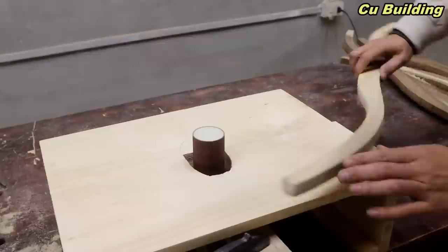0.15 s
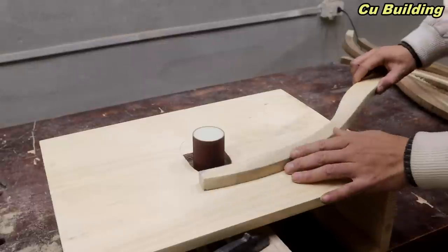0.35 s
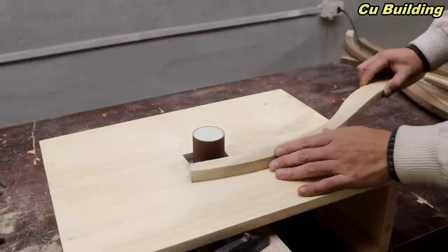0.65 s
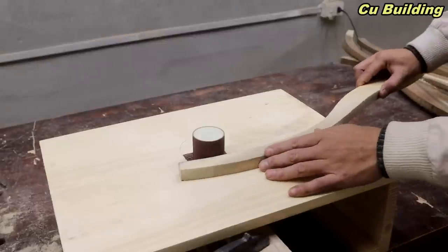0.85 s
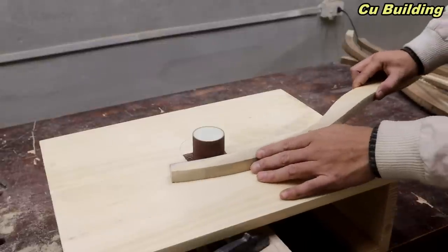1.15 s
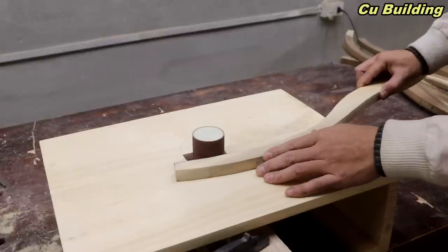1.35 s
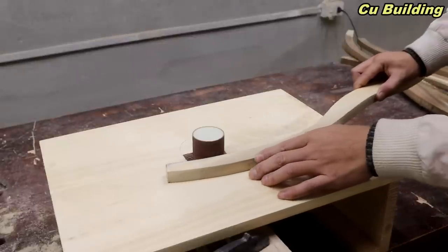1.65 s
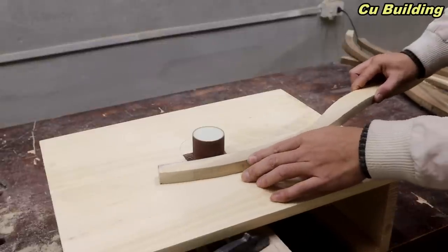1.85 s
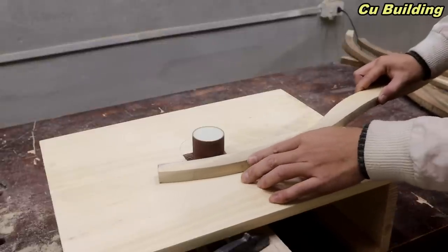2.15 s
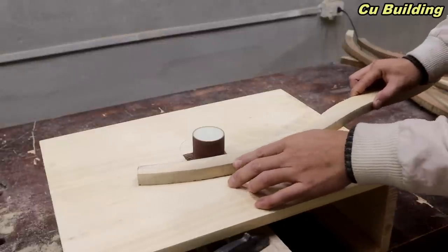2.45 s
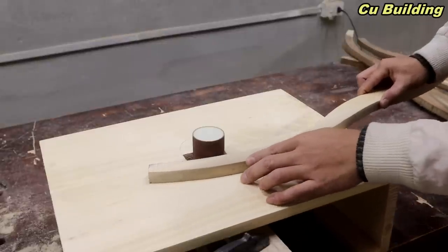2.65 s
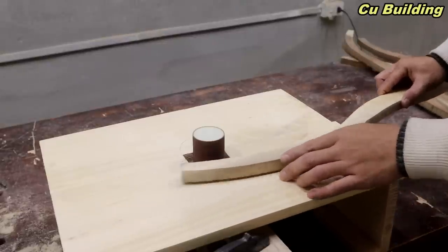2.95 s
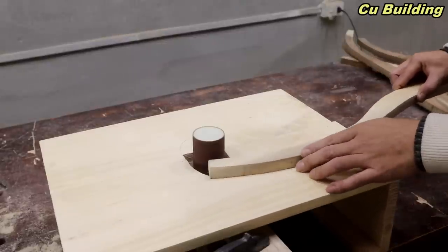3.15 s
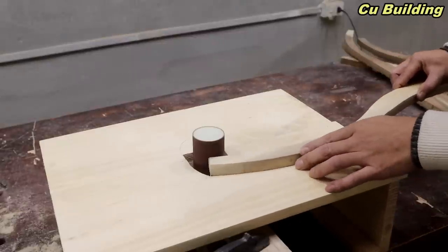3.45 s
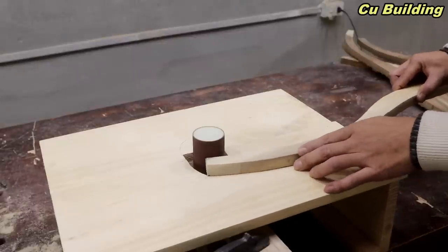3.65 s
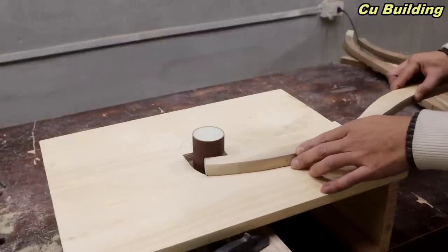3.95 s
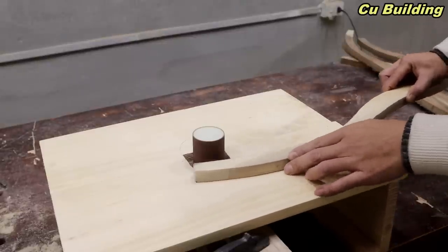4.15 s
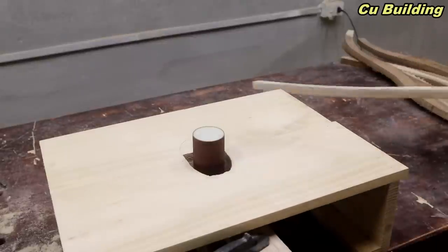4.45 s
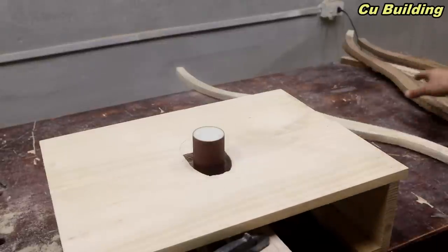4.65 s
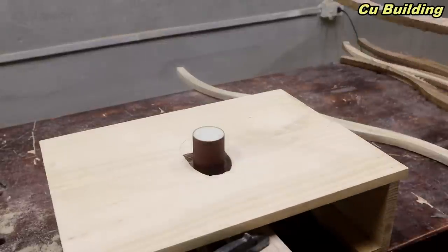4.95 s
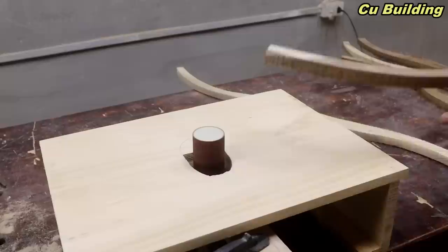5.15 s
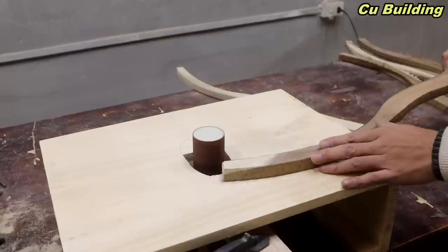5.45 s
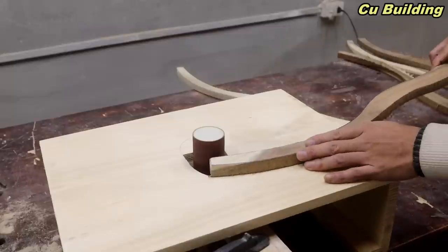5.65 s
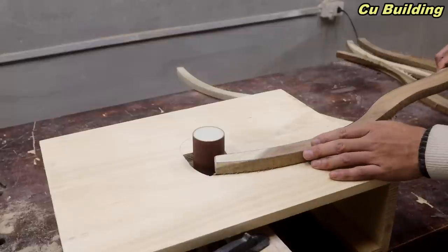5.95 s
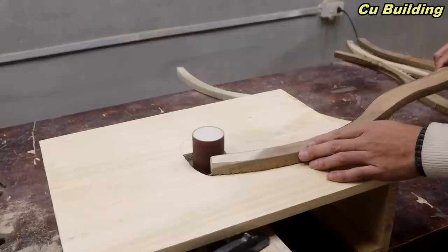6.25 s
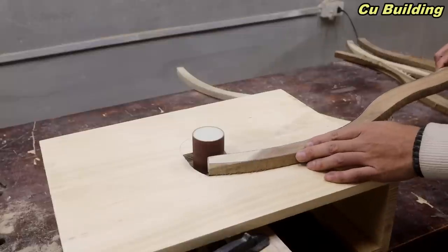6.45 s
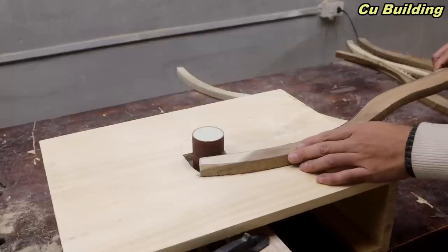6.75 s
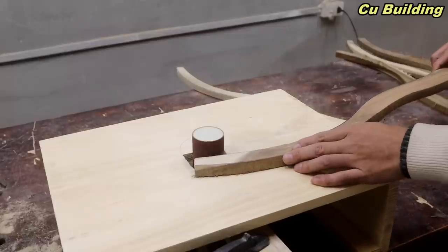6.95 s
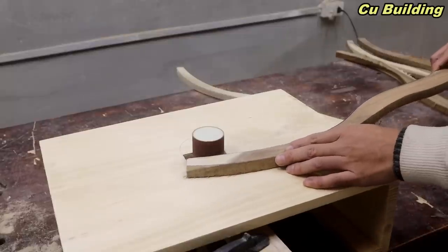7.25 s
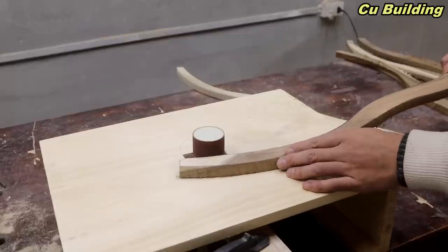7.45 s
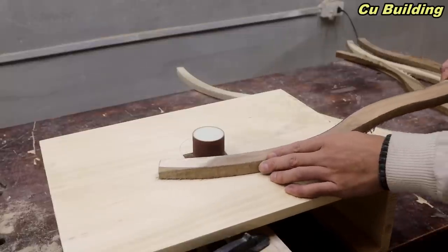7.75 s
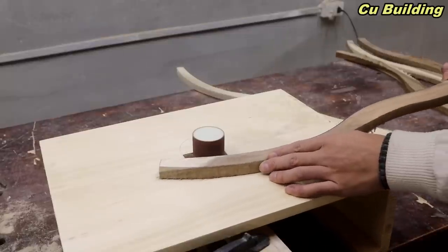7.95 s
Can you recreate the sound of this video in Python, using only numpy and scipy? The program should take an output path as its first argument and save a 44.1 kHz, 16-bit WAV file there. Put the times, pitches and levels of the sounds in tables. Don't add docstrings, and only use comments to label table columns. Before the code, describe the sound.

A small geared motor is already whining at 0 s, close to a stereo microphone pair in a workshop: a strong whistle near 1.7 kHz, a higher one near 5 kHz, lower hums and airy fan hiss. A soft panel hum marks the first touch at 0.1 s. A faint distant engine swells around 1 s. From 1 s the wood presses on the drum; dry gritty rasp and low strip chatter rise while all whines sag together, swelling and fading as they sweep through resonances, easing around 3 s and pressing again until 4.2 s. The motor climbs back to its free pitch. At 4.7 s the strip lands with a bright, rattling wooden clack, and overall loudness dips, then creeps back. From 5.8 s a second pass rasps harder, pulling the pitch lowest around 7 s, with faint dull table bumps between 6.5 and 7.6 s. Sanding continues to the end at about 8 s.

```python
import sys
import numpy as np
from scipy import signal
from scipy.fft import rfft, irfft, next_fast_len
from scipy.io import wavfile
from scipy.ndimage import map_coordinates

SR = 44100
rng = np.random.default_rng(int(sys.argv[2]) if len(sys.argv) > 2 else 0)


def voltage_ratio(decibels):
    exponent = np.asarray(decibels, float) / 20
    return 10 ** exponent


def generate_wav(sig):
    pcm = np.round(np.clip(np.atleast_2d(sig).T, -1, 1) * 32767).astype(np.int16)
    wavfile.write(sys.argv[1], SR, pcm)


N = 357651
TIME = np.arange(N) / SR
PADDED = next_fast_len(N + 4096, real=True)
HZ = np.arange(PADDED // 2 + 1) * SR / PADDED + 1e-3

MESH = 3.6985
DRUM = MESH / 41
FREE_TURNS = 460.5
TORQUE_S = 0.013

# frequency in Hz, likeness 0-1, lead of the left in radians, left minus right in dB.
PAIR = [(40, .6, .05, .3), (130, 0.93, 0.11, 0), (400, 0.92, 0.17, -0.8), (900, 0.96, 0.41, 0),
        (1840, 0.9, 0.45, 0.2), (3000, 0.71, 0.47, -1), (5160, 0.87, 0.41, -1.5), (7300, 0.62, 0.23, -3.5),
        (8660, 0.52, 1.16, -4), (9870, .45, 3.1, -6.2), (16000, 0.43, 2.1, 2)]


def lag(x, seconds):
    r = np.exp(-1 / (seconds * SR))
    return signal.lfilter([1 - r], [1, -r], x - x[0]) + x[0]


def drift(rate):
    knots = rng.standard_normal(2000)
    places = np.minimum(TIME[::64] * rate, 1990)
    return map_coordinates(knots, [places], order=3).repeat(64)[:N]


def swells(rows):
    return sum(db * np.exp(-((TIME - s) / length) ** 2) for s, length, db in rows)


def at_hz(rows, hz, column=1):
    return np.interp(np.log(hz), np.log(np.array(rows)[:, 0]), np.array(rows)[:, column])


def heard(x):
    half_lead = np.exp(.5j * at_hz(PAIR, HZ, column=2))
    half = half_lead * voltage_ratio(at_hz(PAIR, HZ, column=3) / 2)
    return irfft(rfft(x, PADDED) * [half, 1 / half], PADDED)[:, :N]


def body_db(hz):
    # frequency in Hz, width in Hz, level in dB.
    resonances = [(359, 8.5, 3), (520, 21, -21), (600, 9.4, -4.5), (646, 74, -10), (823, 50, 7),
                  (1060, 26, 3), (1183.4, 26, 3), (1315, 32, -2), (1440, 50, -10), (1588, 84, 1.5),
                  (1710, 280, -7.5), (2227, 29, -9.5), (2273, 13.5, 4.5), (2591, 69, 2), (2840, 13, -2),
                  (2915, 27, 2.5), (3120, 46, -4), (3280, 28, -12), (3624, 164, 0.5), (4270, 260, 0.5),
                  (4700, 55, -16), (5010, 97, -6), (5280, 110, -2), (5660, 110, 0), (6030, 50, 0),
                  (6280, 82, 1), (7140, 120, -4), (8240, 86, -7)]
    floor_db = -3.5
    power = sum(voltage_ratio(2 * db) / (1 + (2 * (hz - at) / width) ** 2) for at, width, db in resonances)
    return 10 * np.log10(power + voltage_ratio(2 * floor_db))


def hand():
    # time in seconds, push as the armature turns per s it costs in the end.
    pushes = [(0, 3.9), (0.144, 1.6), (1.007, 24.2), (1.272, 1.3), (1.381, 28.3), (1.503, 42.6),
              (1.763, 40.2), (1.963, 10.1), (2.1, 39.2), (2.53, 4.4), (2.695, 29.2), (2.919, 4.9),
              (3.21, 6.2), (3.513, 25.8), (3.763, 1.2), (3.831, 26.7), (3.975, 35.4), (4.221, 0.0),
              (4.473, 1.3), (5.04, 0.2), (5.804, 25.1), (5.943, 6.5), (6.164, 37.2), (6.323, 53.2),
              (6.758, 62.7), (7.38, 48.9), (7.526, 0.0), (7.652, 37.4), (7.806, 14.3), (7.99, 32.3)]
    grip_s, flywheel_s = .06, .23
    s, push = np.transpose(pushes)
    changes = np.ravel([s[1:] - grip_s / 2, s[1:] + grip_s / 2], "F")
    held = np.interp(TIME, changes, push.repeat(2)[1:-1])
    return held, lag(held, flywheel_s)


def tone(turns, multiple, level_db):
    return np.sqrt(2) * voltage_ratio(level_db) * np.sin(2 * np.pi * (multiple * turns + rng.random()))


def motor_whines(turns, push, speed):
    # frequency in Hz, width in Hz, level in dB.
    main_modes = [
        [(415, 1.2, -62), (426.4, 6.9, -33), (430.7, 6.9, -41.5), (444.44, 6.3, -30), (460.95, 6.2, -33.5)],
        [(813.6, 6.6, -42.5), (823, 11, -44.5), (838, 10.1, -35.5), (856.4, 9.3, -39.5), (870.4, 14.4, -37.5),
         (893.3, 4.6, -36), (906, 2.8, -35.5)],
        [(1461.5, 6.5, -24), (1500, 15.8, -38), (1540, 5.3, -28), (1561.5, 17.5, -34), (1599.4, 42, -35),
         (1657.3, 12, -33), (1677, 16.8, -33.5), (1694, 3.8, -31), (1714.4, 8.7, -21.5)],
    ]
    order_modes = [
        [(1208, 3, -50), (1244.3, 7.5, -53), (1282.5, 11.4, -51), (1324, 140, -56.2), (1352, 12.0, -53)],
        [(1584, 41, -39), (1673.7, 29, -44.9), (1734.6, 74, -48), (1795, 4.3, -40), (1806, 5.2, -39.5),
         (1834, 19.8, -45)],
        [(5400, 29.3, -46), (5715, 126.0, -49), (5790, 40, -49.1)],
        [(356.8, 4.1, -45.8), (373, 3.0, -59.5)],
    ]
    mesh_modes = [
        [(4436, 32.7, -47), (4600, 261.2, -50), (4680, 26, -37), (4800, 13.3, -40), (4957, 70, -38.5),
         (5050, 26, -39), (5182, 35.6, -19.5)],
        [(2960, 46.1, -39.5), (3130, 81.5, -45), (3325, 18.6, -40.5), (3387.0, 13.0, -43.6)],
        [(1050, 90, -48), (1180, 14.6, -40.5), (1200, 18, -44.5)],
        [(2300, 34, -38.5), (2378.3, 17.0, -37), (2485, 13.2, -46), (2586, 12, -40), (2670, 7.0, -43)],
    ]
    side_modes = [
        [(2181.0, 6.5, -53), (2287, 40, -45), (2368.1, 79, -51)],
        [(2633.6, 8.3, -43), (2780, 37.4, -55.2), (2820, 7.7, -40), (2891, 110, -43)],
    ]
    torque_share = [-0.077, 0.6, -0.0077, 1.7, .55, 1.1, 1.8, 0.31, 0.046, 0.65, -0.14, 0.68, -.13]
    # time in seconds, length in seconds, level in dB.
    whine_swells = [
        [(3.1, 0.11, 2.5), (6.3, 0.073, -4.5), (7.3, 0.15, -9)],
        [(1.6, 0.064, 2), (4.06, 0.035, 6), (7.46, 0.11, 5.5)],
        [(.1, .12, 6), (.6, 0.43, -11), (1.25, .03, -8.0), (2.76, .1, -6), (3.22, .1, 1.5), (3.8, .12, -2),
         (5.1, 0.12, -7), (5.3, .2, 3.5), (6.7, 0.042, 6), (7.6, 0.045, -4.5)],
        [(4.13, 0.081, 13.5)],
        [(.3, .3, -6), (2.72, 0.096, 8.5), (4.4, .1, 5), (4.6, .08, -8), (5.7, 0.13, -3.0), (6.02, .06, 8),
         (6.8, 0.22, -3.0)],
        [(6.3, .08, 1.5), (7.2, .3, -2), (7.95, .1, 6)],
    ]
    idle_push, full_push = 4.5, 25.7

    multiples = (1, 2, MESH, 3, 4, 13, 1 - DRUM, 3 * MESH, 2 * MESH,
                 MESH - 1, MESH + 2, 2 * MESH - 2, 2 * MESH - 1)
    swells_by_multiple = dict(zip((1, 2, MESH, 13, 3 * MESH, MESH - 1), whine_swells))
    wrapped = np.r_[turns, np.arange(N - PADDED + 1, 1) * speed[0] / SR]
    torque_db = 20 * np.log10((lag(push, TORQUE_S) + idle_push) / full_push)
    spectrum = 0
    all_modes = main_modes + order_modes + mesh_modes + side_modes
    for multiple, modes, share in zip(multiples, all_modes, torque_share):
        room = sum(voltage_ratio(db) / (1 + 2j * (HZ - hz) / width) for hz, width, db in modes)
        flutter_db = (.6 if multiple < 3.9 else 2.2) * drift(12.0)
        level_db = share * torque_db + flutter_db + swells(swells_by_multiple.get(multiple, []))
        level_db = np.r_[level_db, np.full(PADDED - N, level_db[0])]
        spectrum = spectrum + room * rfft(tone(wrapped, multiple, level_db))
    return heard(irfft(spectrum, PADDED)[:N])


def faint_whines(turns, speed):
    # multiple of the mesh, multiple of the armature, level in dB.
    combined = [(1, 1, -49), (2, 1, -50), (2, 2, -52), (3, -1, -49), (3, -2, -51), (3, 2, -50),
                (4, -1, -47)]
    # multiple of the armature, level in dB.
    cage = [(1.368, -54), (2.324, -57), (5.81, -51), (6.81, -51)]
    bearing_db = [-50.5, -51.5, -56.5]
    ball_passes = .563

    faint = cage + [(m * MESH + a, db) for m, a, db in combined]
    faint += [(k + 1 + ball_passes, db) for k, db in enumerate(bearing_db)]
    out = 0
    for multiple, db in faint:
        swell_db = 1.78 * body_db(multiple * speed[::64]).repeat(64)[:N]
        out = out + tone(turns, multiple, db + swell_db + 2.0 * drift(4.01))
    return heard(out)


def noise(colour, band_hz, resonant):
    gain = voltage_ratio(at_hz(colour, HZ) + resonant * body_db(HZ))
    inside = gain[(HZ > band_hz[0]) & (HZ < band_hz[1])]
    gain = gain / np.sqrt(2 * np.sum(inside ** 2) / PADDED)
    alike = np.clip(at_hz(PAIR, HZ), 0, 1)
    white = rfft(rng.standard_normal((3, PADDED)))
    shared = heard(irfft(white[0] * gain * np.sqrt(alike), PADDED))
    diffuse = irfft(white[1:] * gain * np.sqrt(1 - alike), PADDED)[:, :N]
    return shared + diffuse


def noise_levels(push, sag):
    # idle level in dB, dB per turn/s lost, dB per turn/s of fresh push, share of a scuff.
    laws = [
        (-64.5, 0.0035, -0.03, .3),
        (-66.5, 0.3444, -0.0444, 6.1),
        (-37.5, 0.0318, 0.0087, 0.86),
        (-33.5, -0.0291, 0.0249, 0.64),
    ]
    # time in seconds, length in seconds, level in dB.
    scuffs = [(1.03, 0.13, 1.5), (2.346, 0.07, 0.3), (2.796, .1, 1), (3.56, 0.072, 1.5),
              (3.884, 0.092, 0.6), (4.094, .1, 0.8), (5.858, .1, 2.1), (6.215, 0.23, 1.54)]
    settle_db, settle_s = [9.7, 9.1, 0.44, 0.97], 1
    fresh = lag(push - sag, TORQUE_S)
    scuff_db = swells(scuffs)
    return [idle + a * sag + b * fresh + c * scuff_db + settle * np.exp(-TIME / settle_s)
            for (idle, a, b, c), settle in zip(laws, settle_db)]


def friction(turns, push, sag):
    # frequency in Hz, level in dB per Hz.
    rumble_colour = [(20, -36), (45, -22), (90, -10), (120, -5), (159, -4), (166, 7), (173, -4), (280, -7),
                     (305, 2), (335, -10), (500, -40)]
    chatter_colour = [(250, -60), (300, -19), (350, -2.5), (430, 7.5), (530, 5), (580, -3), (700, -52)]
    rasp_colour = [(200, -55), (300, -11.5), (560, -10.5), (750, -2.5), (950, -5.5), (1200, -0.5),
                   (2000, 1), (3000, -0.5), (3800, -4), (5500, -23)]
    hiss_colour = [(1500, -39), (3000, -8.5), (4200, -2.5), (5500, -2), (6500, -2.5), (8500, -3.5),
                   (9500, -6.5), (10500, -9.5), (13000, -12), (15700, -12.5)]
    rumble_db, chatter_db, rasp_db, hiss_db = noise_levels(push, sag)
    drum_throb = 1 + 0.055 * np.sin(2 * np.pi * DRUM * turns)
    brush_throb = 1 + 0.037 * np.sin(2 * np.pi * turns)
    rumble = voltage_ratio(rumble_db + 2.4 * drift(11.0)) * noise(rumble_colour, (30, 280), resonant=0.16)
    chatter = voltage_ratio(chatter_db + 0.51 * drift(28.0)) * noise(chatter_colour, (495, 600), resonant=0.65)
    rasp = voltage_ratio(rasp_db - 1.0 + 1.1 * drift(14.0)) * noise(rasp_colour, (1850, 3300), resonant=1.0)
    hiss = voltage_ratio(hiss_db + 0.77 + 0.51 * drift(13.0)) * noise(hiss_colour, (5500, 12000), resonant=0.71)
    return rumble + (chatter + rasp) * drum_throb + hiss * brush_throb


def traffic():
    # time in seconds, firings per s, level in dB.
    engine = [(0, 47, -80), (.5, 48, -65), (.9, 49, -62), (1.0, 50, -55), (1.15, 50.5, -59),
              (1.27, 51, -56), (1.6, 51, -67), (2.2, 51, -90)]
    # multiple of the firing rate, level in dB.
    orders = [(4, -5), (5, -6), (6, -1)]
    s, rate, db = np.transpose(engine)
    firings = np.cumsum(np.interp(TIME, s, rate)) / SR
    level_db = np.interp(TIME, s, db)
    return heard(sum(tone(firings, k, level_db + order_db + 2.5 * drift(8.0)) for k, order_db in orders))


def knocks(rows, cycles, crack_db, crack_s, tail_s, tail_db, low_hz, top_hz):
    out = np.zeros(N)
    age = np.arange(SR // 2) / SR
    band = signal.butter(2, [low_hz, top_hz], "band", fs=SR, output="sos")
    for s, db, hz, force_db in rows:
        grit = rng.standard_normal((2, len(age)))
        decay = np.exp(-age * hz / cycles)
        ring = np.sin(2 * np.pi * hz * age) * decay * (1 - decay ** 4)
        onset = np.minimum(age / 0.0005, 1)
        crack = voltage_ratio(crack_db + force_db) * grit[0] * np.exp(-age / crack_s) * onset
        tail = voltage_ratio(tail_db + force_db) * grit[1] * np.exp(-age / tail_s)
        out[round(s * SR):][:len(age)] += voltage_ratio(db) * signal.sosfilt(band, ring + crack + tail)
    return heard(out)


def panel_hums():
    # time in seconds, peak in dB, pitch in Hz, crack in dB.
    hums = [
        (.11, -39, 303, -32),
        (.16, -43, 158, -30),
        (2.8, -44, 297, -30),
        (4.75, -49, 302, -30),
    ]
    return knocks(hums, cycles=32.0, crack_db=-5, crack_s=.02, tail_s=.05, tail_db=-5, low_hz=100, top_hz=500)


def table_bumps():
    # time in seconds, peak in dB, pitch in Hz, crack in dB.
    bumps = [(1.49, -58, 60, -10), (6.52, -54, 121, 8), (7.0, -54, 80, -1), (7.19, -50, 180, 0),
             (7.27, -58, 90, 10), (7.6, -51, 200, 0)]
    return knocks(bumps, cycles=2.3, crack_db=18, crack_s=0.025, tail_s=0.046, tail_db=2, low_hz=35, top_hz=320)


def strip_clacks():
    # time in seconds, peak in dB, pitch in Hz, crack in dB.
    clacks = [
        (4.682, -20, 2800, -3),
        (4.690, -16, 3000, 9),
        (4.699, -22, 2700, 0),
        (4.7415, -22, 3200, 9),
        (4.754, -20, 1690, -2),
    ]
    return knocks(clacks, cycles=13.0, crack_db=-1, crack_s=.0035, tail_s=.045, tail_db=-16,
                  low_hz=350, top_hz=6000)


def ducking():
    start_s, dip_db, attack_s, release_s = 4.72, -5, 0.099, 0.73
    age = np.maximum(TIME - start_s, 0)
    return voltage_ratio(dip_db * (1 - np.exp(-age / attack_s)) * np.exp(-age / release_s))


def scene():
    push, sag = hand()
    speed = FREE_TURNS - sag
    turns = np.cumsum(speed) / SR
    machine = motor_whines(turns, push, speed) + faint_whines(turns, speed) + friction(turns, push, sag)
    return machine + traffic() + panel_hums() + table_bumps() + strip_clacks()


def low_pass(x):
    return signal.sosfilt(signal.butter(12, 16920, fs=SR, output="sos"), x)


def record(dry):
    cutoff_hz = 15715
    walled = irfft(rfft(dry * ducking(), PADDED) * (HZ < cutoff_hz), PADDED)[:, :N]
    return low_pass(walled)


dry = scene()
out = record(dry)
generate_wav(out)
```